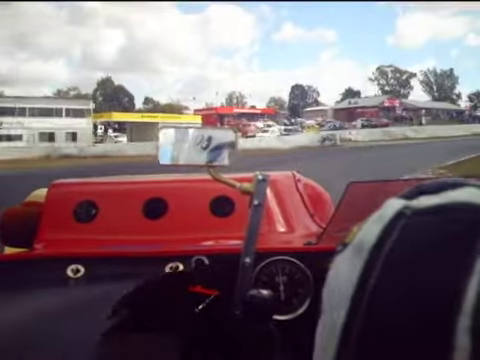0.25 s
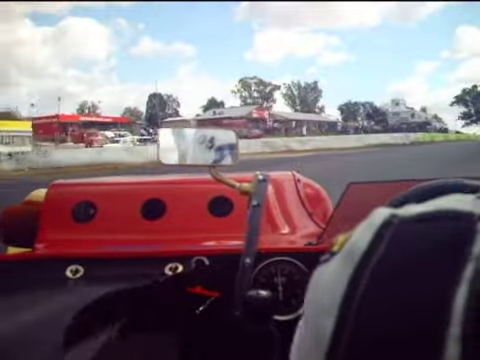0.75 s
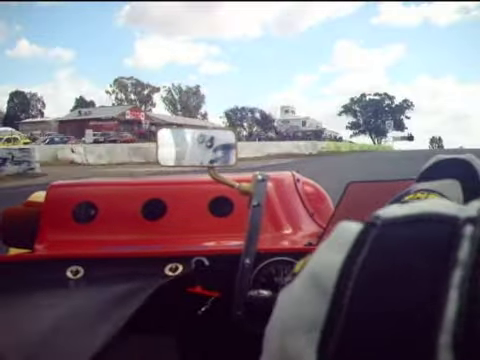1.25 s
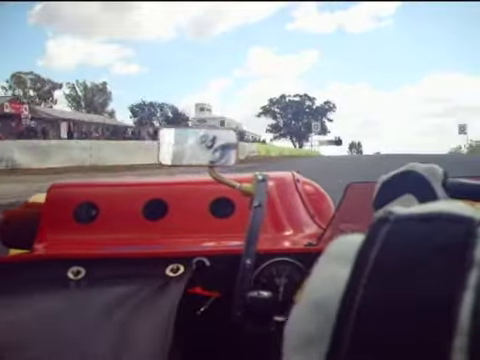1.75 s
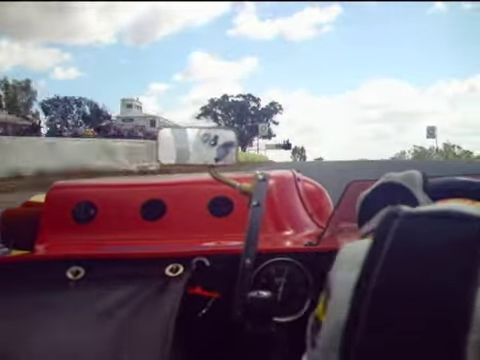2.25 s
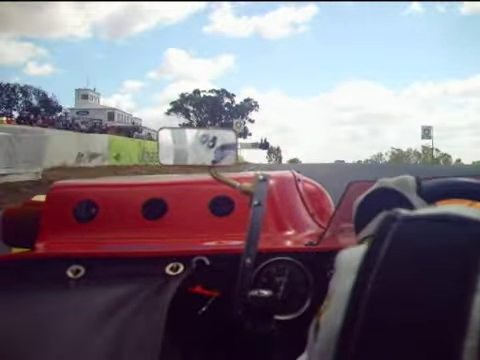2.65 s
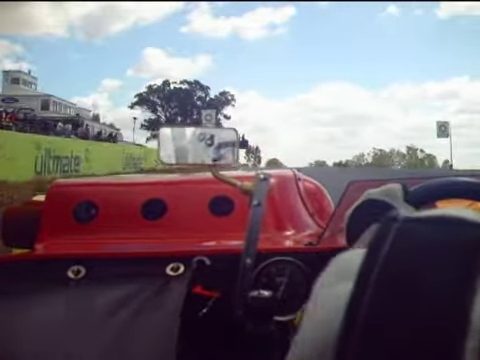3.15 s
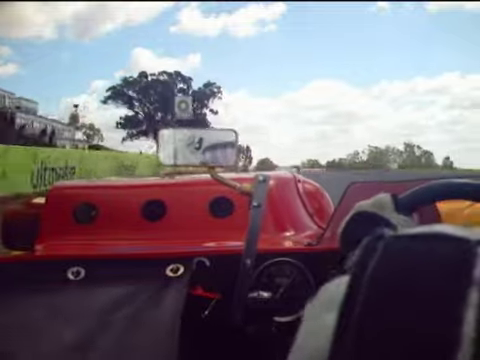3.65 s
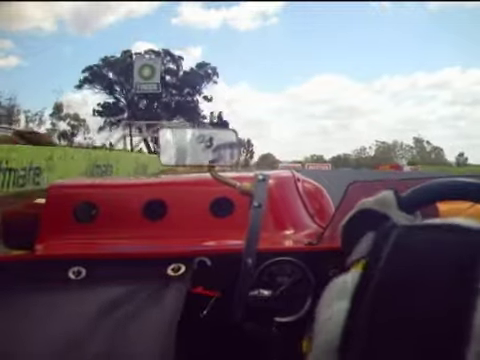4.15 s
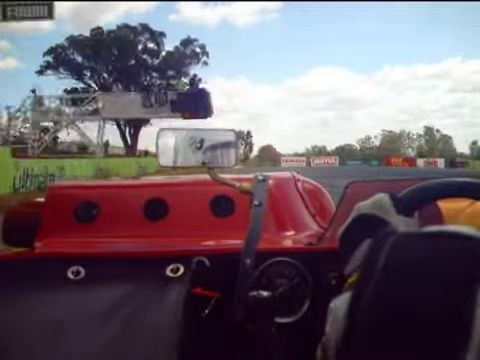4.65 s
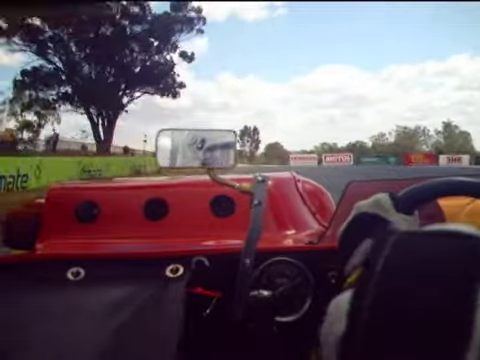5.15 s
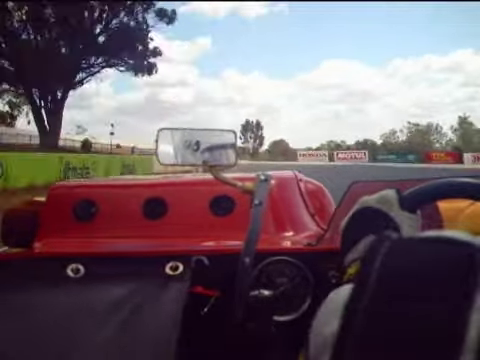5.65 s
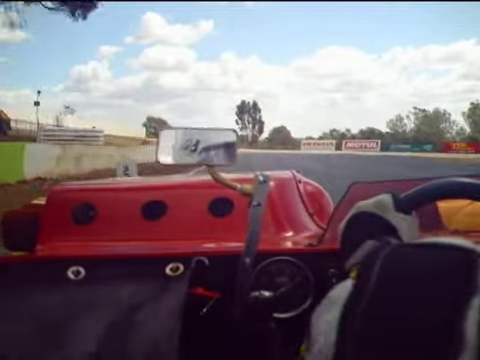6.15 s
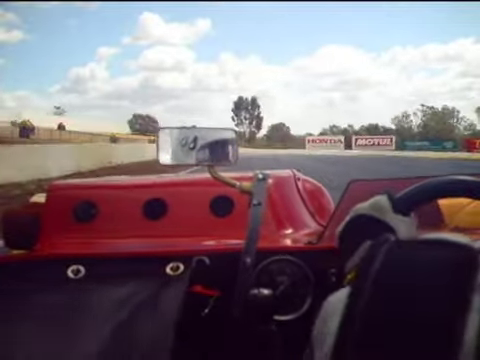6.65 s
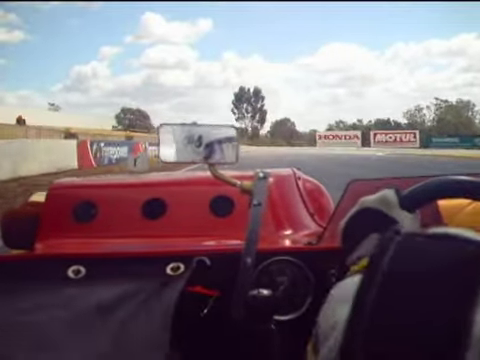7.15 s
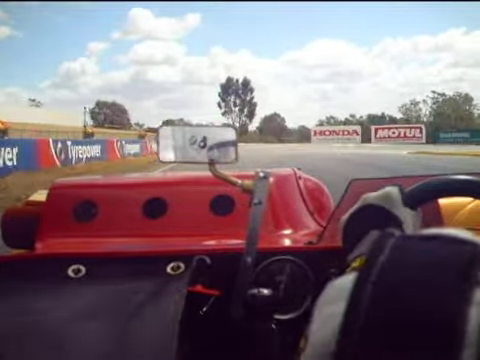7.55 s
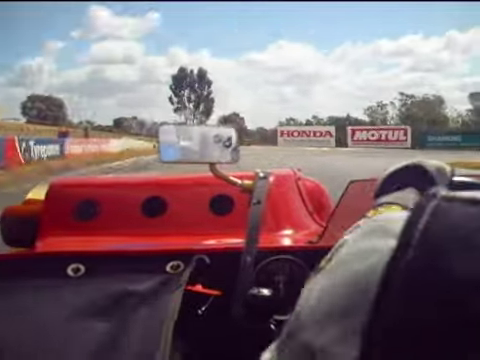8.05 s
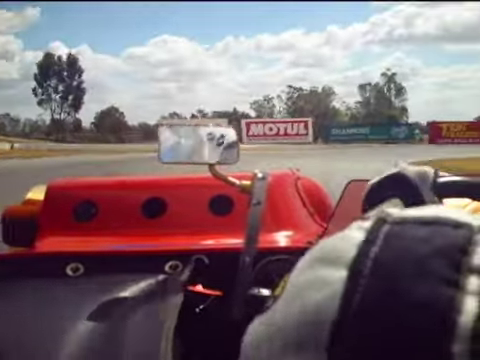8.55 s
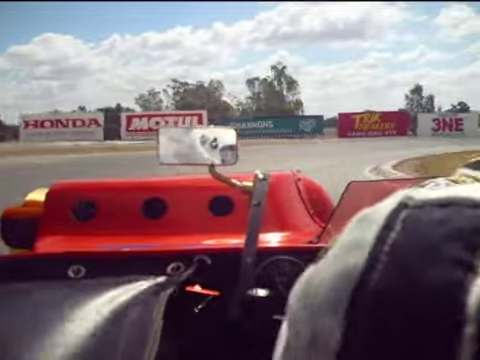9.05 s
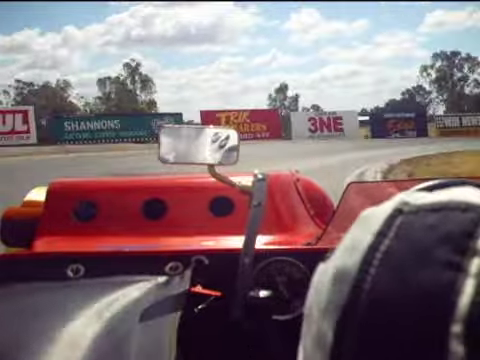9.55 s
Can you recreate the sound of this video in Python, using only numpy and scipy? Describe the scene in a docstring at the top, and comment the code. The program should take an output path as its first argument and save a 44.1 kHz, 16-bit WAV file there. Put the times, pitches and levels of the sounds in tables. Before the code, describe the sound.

A four-cylinder racing engine runs throughout, heard from its open cockpit with dull treble, over wind rumble on the microphone and a rush of air and tyres. A brief metallic knock comes right at the start. From about 1 second the engine pulls hard and rises steadily in pitch, with gear whine and ticking valves. From 4 seconds the exhaust swells into a loud boom, and sharp, irregular overload cracks break through between 4.4 and 6.4 seconds. Near 5.9 seconds the throttle lifts, and the crackle is thickest and raspy. The pitch then falls until nearly 9 seconds, while gears chatter in bursts and brakes rub with a thin ring, strongest just before 9. Two light knocks come just after 8 seconds. The engine settles into a low drone and gently picks up from about 9.2 seconds to the end.

```python
"""A four-cylinder racing engine, heard from its open car, pulls hard, lifts off near 5.9 s and,
after braking, picks up again. The exhaust booms as the firing rate sweeps through a resonance.
Straight-cut gears whine, and chatter when coasting; valves tap, brakes rub and wind buffets the cockpit.
A low-rate recorder dulls the treble, overloads on the boom and cracks at wave crests."""
import sys
import numpy as np
from scipy import signal
from scipy.fft import rfft, irfft, next_fast_len
from scipy.io import wavfile
from scipy.ndimage import uniform_filter1d

SR = 44100
rng = np.random.default_rng(int(sys.argv[2]) if len(sys.argv) > 2 else 0)


def persist_wave(psi):
    """Save psi, clipped to +-1, as 16-bit WAV."""
    counts = np.round(np.clip(psi, -1, 1) * 32767).astype(np.int16)
    wavfile.write(sys.argv[1], SR, np.atleast_2d(counts).T)


N = 431738
TIME = np.arange(N) / SR


# boom at each firing rate: f/Hz, pulling level/dB, level after lift-off/dB
BOOM_LEVELS = [(159.4, -17.5, -15.5), (169, -17, -16), (185, -24.5, -20), (192, -24, -20),
               (214, -29, -29.5), (219.7, -23, -20), (224.5, -15.5, -18), (233.7, -8, -11.5),
               (242, -10.5, -11), (244.5, -12.5, -28.5)]
# brief swells and dips: t/s, half length/s, change/dB
BOOM_SWELLS = [(5.48, 0.049, -2.5), (6.432, 0.025, 4), (6.685, 0.015, 7.5), (6.749, 0.018, -12)]

def boom(hz, firings, lift_off_s=5.85, fade_s=.2, flutter_db=.7):
    """The exhaust's main note, loudest where the firing rate meets a resonance."""
    rate, pulling, coasting = np.transpose(BOOM_LEVELS)
    lifted = np.clip((TIME - lift_off_s) / fade_s, 0, 1)
    level_db = (1 - lifted) * np.interp(hz, rate, pulling) + lifted * np.interp(hz, rate, coasting)
    level_db += sum(db * bump(s, half_s) for s, half_s, db in BOOM_SWELLS)
    return undb(level_db + flutter_db * walk(35)) * np.sin(2 * np.pi * firings)


# exhaust tones, in quarter steps as the cylinders are unequal: multiple of firing rate, level/dB
EXHAUST_TONES = [(.5, -37), (.75, -37.5), (1.25, -41.5), (1.5, -49), (2, -44), (2.25, -53.5), (2.5, -48),
                 (2.75, -47.5), (3, -44), (3.25, -52.5), (3.5, -50), (3.75, -48.5), (4, -51.5),
                 (4.25, -53.5), (4.5, -58), (4.75, -50), (5, -51.5), (5.25, -59), (5.5, -50.5),
                 (5.75, -59.5), (6, -51.5), (6.5, -48.5), (7, -48.5), (9.75, -52), (10.75, -51.5),
                 (11.75, -49.5), (12.25, -45.5), (12.75, -57)]
# pipe and bodywork resonances: f/Hz, width/Hz, boost/dB
BODY_RESONANCES = [(122.43, 4.9, 14.5), (238, 5, 5.5), (328.2, 6.1, 14), (465, 12, 3.5), (574.6, 18, 6.5),
                   (651, 6.2, 7.5), (660, 18, -5), (1017, 25, 9), (1210, 21, 5.5), (1480, 30, 4),
                   (2400, 30, 1.5), (2610, 78, 7.5), (2647, 58, 8.5)]

def exhaust(hz, firings, load, rough_db=3, jitter=.017):
    """The boom, plus tones that grow with throttle and waver as the fuel burns unevenly."""
    out = boom(hz, firings)
    uneven = firings + jitter * walk(40)
    for multiple, db in EXHAUST_TONES:
        size = load * undb(db + resonance_db(multiple * hz, BODY_RESONANCES) + rough_db * walk(9))
        out += size * np.sin(2 * np.pi * (multiple * uneven + rng.random()))
    return np.sqrt(2) * out


# shaft and gear tones: multiple of shaft rate, driving level/dB, coasting level/dB, waver/rad
GEAR_TONES = [(1, -31, -31.5, 0.95), (2, -34, -42.5, 0.15), (21, -43, -47, 1), (23, -44, -47, 0.71)]
# gear case resonances: f/Hz, width/Hz, boost/dB
CASE_RESONANCES = [(1450, 110, -1.5), (1604, 22, 6.5), (1667, 22, 7.5), (1950, 70, 5.5), (2110, 20, -5.5)]
SHAFT_RATIO = .4152  # shaft turns per firing

def gearbox(hz, firings, load, case_ring, tooth_db=6):
    """An unbalanced shaft throbs and teeth whine; coasting, they lose contact and the whine breaks up."""
    shaft, shaft_hz = SHAFT_RATIO * firings, SHAFT_RATIO * hz
    slack = 1 - load
    ring_db = 20 * np.log10(case_ring / np.median(case_ring))
    out = 0
    for multiple, drive_db, coast_db, waver in GEAR_TONES:
        db = load * drive_db + slack * coast_db + 1.9 * walk(6.3)
        db += resonance_db(multiple * shaft_hz, CASE_RESONANCES)
        db += (multiple > 2) * slack * (ring_db + tooth_db * walk(110))  # tooth tones only
        wobble = waver * (1 + 1.8 * slack) * walk(45)
        out += undb(db) * np.sin(2 * np.pi * multiple * shaft + wobble)
    return np.sqrt(2) * out


def squeal(hz, firings, load, multiple=19, centre_hz=4000, width_hz=85):
    """A thin squeal as a high multiple of the firing rate passes a sharp resonance."""
    off_centre = (multiple * hz - centre_hz) / width_hz
    size = load * undb(-52 + 1.7 * walk(25)) / np.sqrt(1 + off_centre ** 2)
    return np.sqrt(2) * size * np.sin(2 * np.pi * multiple * firings)


# chassis drone: t/s, level/dB
DRONE_LEVELS = [(0, -42), (1, -52), (2, -53.5), (5, -50), (7.6, -44), (8.1, -33), (8.8, -30.5), (9.3, -24),
                (9.79, -25)]

def drone(firings):
    """At low revs the chassis hums at firing plus shaft rate, and at twice the firing rate."""
    hum = np.sin(2 * np.pi * (1 + SHAFT_RATIO) * firings + .12 * walk(27))
    hum += undb(-12) * np.sin(2 * np.pi * 2 * firings + .5 * walk(25))
    return np.sqrt(2) * undb(curve(DRONE_LEVELS) + .98 * walk(5.8)) * hum


# bursts of gear chatter: start/s, end/s, clatter level/dB, case ring level/dB
CHATTER_BURSTS = [(2.983, 3.4, -42, -48), (5.15, 5.707, -38.5, -37), (6.364, 7.306, -32.5, -34),
                  (7.3, 7.728, -32, -37), (7.839, 7.972, -31, -32), (8.027, 8.115, -29.5, -31.5),
                  (8.216, 8.262, -30.5, -26.5), (8.347, 8.448, -30.5, -33), (8.493, 9.039, -33, -35.5)]

def rattling(hz, load, edge_s=.021):
    """Strength of clatter and case ring: both grow with throttle and in bursts, clatter also with revs."""
    octaves = np.log2(hz / 200)
    rattle_power = (undb(-29.5 + 5.2 * octaves) * load ** .3) ** 2
    ring_power = (undb(-34.5 - 1.4 * octaves) * load ** .4) ** 2
    for start, end, rattle_db, ring_db in CHATTER_BURSTS:
        burst = np.clip(.5 + np.minimum(TIME - start, end - TIME) / edge_s, 0, 1)
        rattle_power += burst * undb(rattle_db) ** 2
        ring_power += burst * undb(ring_db) ** 2
    return np.sqrt(rattle_power), np.sqrt(ring_power)


# ring of the valve gear: f/Hz, level/dB
VALVE_SPECTRUM = [(900, -23.5), (1400, -8), (1900, -6), (2130, -9), (2330, 5), (2450, -1.5), (2580, -0.5),
                  (2780, -2.5), (2950, -8.5), (3120, -10.5), (3500, -20), (3900, -23.5), (4300, -33.5)]

def valves(firings, count=16, ring_s=.0033, scatter_db=4, slop_s=.00005):
    """Valves tap shut at set points of each four-firing cycle, each with its own strength and some slop."""
    age = np.arange(1024) / SR
    ring = rng.standard_normal(len(age)) * np.exp(-age / ring_s)
    cycles = np.arange(int(firings[-1] / 4))[:, None]
    closings = 4 * (cycles + (np.arange(count) + rng.random(count)) / count)
    strength_db = 3 * rng.standard_normal(count)
    late, size = np.moveaxis(rng.standard_normal((600, count, 2))[:len(cycles)], -1, 0)
    at = np.interp(closings, firings, np.arange(N)) + slop_s * SR * late
    at = np.clip(at, 0, N - 1).astype(int)
    taps = np.bincount(at.ravel(), undb(strength_db + scatter_db * size).ravel(), N)
    return colour(signal.fftconvolve(taps, ring)[:N], VALVE_SPECTRUM)


# clattering teeth and the ringing gear case: f/Hz, level/dB
TEETH_SPECTRUM = [(900, -23.5), (1400, -27), (1900, -5.5), (2120, -10), (2350, 6.5), (2550, 8), (2750, 12),
                  (2950, 7), (3120, -5.5), (3500, -8), (3900, -21.5), (4300, -78)]
CASE_SPECTRUM = [(900, -30), (1250, -16.5), (1460, -1), (1550, -4.5), (1660, -1), (1800, -6), (2100, -9.5),
                 (2800, -27.5)]

def clatter(firings, load, rattle, case_ring, throb=.19):
    """Valve taps ring the engine as it pulls; coasting, the random chatter of loose teeth takes over."""
    taps = valves(firings)
    chatter = noise() * (1 + throb * np.cos(2 * np.pi * firings)) * undb(2 * walk(300))
    tap_share = .6 * load
    blows = np.sqrt(tap_share) * taps + np.sqrt(1 - tap_share) * colour(chatter, TEETH_SPECTRUM)
    return rattle * undb(-1) * blows + case_ring * undb(-4) * colour(chatter, CASE_SPECTRUM)


# rubbing of the pads: t/s, level/dB
BRAKE_LEVELS = [(0, -73.5), (6.2, -68), (6.5, -38.5), (7.8, -44.5), (8.6, -33), (8.75, -28.5), (9, -28),
                (9.08, -34), (9.79, -36.5)]
# ring of the discs: f/Hz, level/dB
DISC_SPECTRUM = [(2400, -29.5), (2570, -9), (2680, 5), (2830, -7), (2950, 4.5), (3060, -17), (3300, -23.5),
                 (3480, -15), (3700, -35.5)]

def brakes():
    """Pads rub unevenly and ring the discs."""
    return undb(curve(BRAKE_LEVELS) + .52 * walk(40)) * colour(noise(), DISC_SPECTRUM)


# single knocks: t/s, level/dB, decay/s
LOOSE_KNOCKS = [(0.087, -28, 0.0047), (0.096, -22, 0.01), (8.086, -32, 0.02), (8.236, -30, 0.018)]

def knocks():
    """Loose parts knock, briefly ringing the gear case and engine."""
    blows = sum(undb(db) * (TIME >= s) * np.exp(-np.abs(TIME - s) / decay) for s, db, decay in LOOSE_KNOCKS)
    metal = sum(colour(noise(), shape) for shape in (CASE_SPECTRUM, TEETH_SPECTRUM, RUSH_SPECTRUM))
    return blows * unit(metal)


# brief swells of deep rumble: t/s, half length/s, level/dB
RUMBLE_SWELLS = [(1.42, 0.036, -23), (1.78, .05, -23.5), (2.153, 0.24, -23.5), (2.53, .05, -25),
                 (3.073, 0.12, -25), (3.69, 0.041, -21), (4, .04, -26.5), (4.36, 0.041, -14),
                 (5.996, .04, -19), (7.331, 0.11, -16.5), (7.5, 0.06, -21.5), (8.43, 0.053, -20.5),
                 (8.84, 0.058, -21)]
# deep rumble of the wind: f/Hz, level/dB
WIND_SPECTRUM = [(15, -15), (24, -5), (32, -2), (38, -3), (46, -6.5), (60, -22), (100, -32.5), (200, -38.5)]

def wind(top_speed_s=5.3, fall_db_per_s=1.24):
    """Wind rumbles on the microphone, building to top speed, then easing; the rumble also swells briefly."""
    steady = undb(-25 - fall_db_per_s * np.abs(TIME - top_speed_s))
    swell_power = sum((undb(db) * bump(s, half_s)) ** 2 for s, half_s, db in RUMBLE_SWELLS)
    return np.sqrt(steady ** 2 + swell_power) * colour(noise(), WIND_SPECTRUM)


# cockpit rumble, and the rush of air and tyres: f/Hz, level/dB
COCKPIT_SPECTRUM = [(40, -6.5), (70, -0.5), (110, -3.5), (170, -5), (235, 3), (280, -1), (330, -14),
                    (450, -16.5), (650, -22), (1000, -48.5)]
RUSH_SPECTRUM = [(200, -6), (400, -5), (600, 1.5), (800, -4), (1050, 5.5), (1300, 3), (1700, 2.5),
                 (2200, -2), (3200, -1.5), (4300, -21.5)]
# the rush, swelling and easing over time: t/s, relative level/dB
RUSH_LEVELS = [(0, -41), (1.2, -39), (3, -40.5), (4.5, -38), (5.6, -42.5), (6.6, -46), (7.3, -42.5),
               (8.5, -45), (9.1, -39.5), (9.79, -41)]

def road_noise():
    """The cockpit rumbles while air and tyres rush."""
    rumble = undb(-27 + .37 * walk(14)) * colour(noise(), COCKPIT_SPECTRUM)
    rush = undb(curve(RUSH_LEVELS) + 3 + .61 * walk(50)) * colour(noise(), RUSH_SPECTRUM)
    return rumble + rush


# extra push into overload, peaking just after the lift-off: t/s, gain/dB
OVERLOAD_SURGE = [(0, -0.5), (4.2, 1), (4.6, 1.4), (5.2, 1), (5.85, 2.2), (5.93, 2.5), (6.05, 4),
                  (6.3, 3.5), (6.42, 2.44), (6.6, 1.77), (9.79, -2.2)]
CEILING, TREBLE_LIMIT_HZ = .73, 4150  # the recorder's largest swing and its treble limit

def overload(x, shake=.11, rasp_db=-22):
    """The surge throws the input off centre and flattens the crests, now above, now below, with a rasp."""
    surge_db = curve(OVERLOAD_SURGE)
    surge = np.clip(surge_db, 0, None)
    bias = shake * surge * np.tanh(walk(90))
    x = x * undb(surge_db) + bias + undb(rasp_db) * rasp(surge)
    return x / (1 + (x / CEILING) ** 24) ** (1 / 24) - .8 * bias


# rasp of the overload: f/Hz, level/dB
RASP_SPECTRUM = [(330, -10.5), (400, -2.5), (440, 10.5), (480, 1.5), (600, -4.5), (720, -3), (830, -11),
                 (970, -5.5), (1400, -12)]

def rasp(surge):
    """A rough noise that grows with the overload."""
    return (surge / surge.max()) ** 2 * colour(noise(), RASP_SPECTRUM)


# runs of random cracks: start/s, end/s, chance per crest, typical length/s
SPUTTER_RUNS = [(5.916, 5.96, .42, 0.00039), (6.007, 6.114, .32, 0.00023), (6.127, 6.243, .25, 0.00016),
                (6.26, 6.326, .32, .00022)]

def sputter(swing, length_spread=.74, edge_db=-32, edge_spread_db=6):
    """Pick crests that collapse by chance; gives rows of t/s, length/s, relative edge level/dB."""
    crests = signal.find_peaks(swing, distance=SR // 700)[0] / SR
    rows = []
    for start, end, chance, length_s in SPUTTER_RUNS:
        luck = rng.uniform(-1, 1, (200, 3))
        for s, (pick, length, edge) in zip(crests[(crests > start) & (crests < end)], luck):
            if abs(pick) < chance:
                stretch = np.exp(np.sqrt(3) * length_spread * length)
                rows.append((s, length_s * stretch, edge_db + np.sqrt(3) * edge_spread_db * edge))
    return rows


# the clearest overload cracks: t/s, relative edge level/dB
CLEAR_CRACKS = [(4.359, -27.5), (4.4392, -25), (4.5112, -25), (4.5157, -26), (4.5264, -41), (4.5364, -26),
                (4.5947, -20), (4.6311, -39), (4.6453, -23.5), (4.6634, -36), (4.7158, -31),
                (4.7502, -20.5), (4.792, -36), (4.8485, -38), (4.9079, -24), (5.011, -20.5), (5.0534, -26),
                (5.101, -45), (5.8349, -23.5), (5.8409, -33), (5.8476, -27), (5.8573, -25), (5.914, -36),
                (5.9223, -35), (5.9384, -23), (5.982, -37), (6.0008, -20.5), (6.0292, -26), (6.0933, -24),
                (6.1253, -24), (6.1544, -19), (6.1835, -25), (6.2627, -36), (6.2769, -25), (6.337, -23),
                (6.3865, -32), (6.401, -21)]

def cracks(x, crack_s=.00014, lag_s=.0012, depth=.74, overshoot=.11, edge_gain_db=14):
    """The recorder's numbers overflow: a crest collapses towards zero and bounces back with a sharp edge."""
    collapse, edges = np.zeros(N), np.zeros(N)
    reach = SR // 900
    offset = np.arange(-reach, reach)
    swing = np.abs(uniform_filter1d(x, size=40))
    clear = [(s + lag_s, crack_s, db) for s, db in CLEAR_CRACKS]
    for s, length_s, edge_db in sputter(swing) + clear:
        first = int(s * SR) - reach
        crest = first + np.argmax(swing[first:first + 2 * reach])
        outside = np.abs(offset) - length_s * SR / 2  # samples beyond the collapse
        rebound = overshoot * np.exp(-((outside - 4) / 3) ** 2)
        collapse[crest + offset] = np.sign(x[crest]) * (rebound - depth * np.clip(.5 - outside, 0, 1))
        edges[crest] = -np.sign(x[crest]) * undb(edge_db + edge_gain_db)
    collapse = signal.sosfilt(signal.butter(1, 190, "high", fs=SR, output="sos"), collapse)
    edges = signal.sosfilt(signal.butter(2, 7000, fs=SR, output="sos"), edges)
    return collapse, edges - low_pass(edges, TREBLE_LIMIT_HZ)


def undb(db):
    """Decibels to gain."""
    return 10 ** (np.asarray(db) / 20)


def curve(table):
    """Join (time, value) points with straight lines."""
    return np.interp(TIME, *np.transpose(table))


def bump(s, half_s):
    """A smooth swell of height 1 around time s."""
    return np.exp(-((TIME - s) / half_s) ** 2)


def unit(x):
    """Scale to an average strength (rms) of 1."""
    return x / np.sqrt(np.mean(x ** 2))


def noise():
    """White noise."""
    return rng.standard_normal(N)


def walk(rate):
    """A smooth random wobble with about `rate` turns a second; strength 1."""
    knots = rng.standard_normal(4000)
    path = np.interp(TIME * rate, np.arange(len(knots)), knots)
    return unit(uniform_filter1d(path, int(SR / rate)))


def resonance_db(hz, resonances):
    """The boost a tone at this frequency gets from nearby resonances."""
    grid = np.arange(SR / 8)
    return np.interp(hz, grid, sum(db / (1 + ((grid - f) / width) ** 2) for f, width, db in resonances))


def colour(x, spectrum):
    """Shape a sound to a spectrum, fading beyond its ends; strength 1."""
    size = next_fast_len(N)
    log_f = np.log(np.fft.rfftfreq(size, 1 / SR) + 1)
    hz, db = np.transpose(spectrum)
    beyond = np.maximum(np.log(hz[0]) - log_f, 0) + np.maximum(log_f - np.log(hz[-1]), 0)
    gain = undb(np.interp(log_f, np.log(hz), db) - 20 * beyond)
    return unit(irfft(rfft(x, size) * gain, size)[:N])


def low_pass(x, hz, order=8):
    """Cut the treble above hz steeply, without delay."""
    margin = SR // 50
    sections = signal.ellip(order, .1, 50, hz, fs=SR, output="sos")
    return signal.sosfiltfilt(sections, np.pad(x, margin))[margin:-margin]


# engine speed as firings per second: t/s, f/Hz
FIRING_RATE = [(0, 184.3), (.4, 183.2), (.8, 185.1), (1.2, 190), (1.6, 193.7), (2.4, 204.1), (3.2, 216.5),
               (4, 225.9), (5.6, 247.2), (5.8, 245.7), (5.92, 240.6), (6.1, 239.7), (6.7, 226.3),
               (7, 221.6), (7.3, 214.1), (7.9, 188.9), (8.75, 160.5), (9.79, 163.8)]
# how hard the throttle makes the engine work: t/s, level/dB
ENGINE_LOAD = [(0, -9.5), (.6, -4.5), (1.3, -0.5), (5.1, -0.5), (5.8, -3.5), (6, -12.5), (6.6, -5),
               (7.4, -11), (8.2, -15), (9, -13.5), (9.2, -8), (9.79, -6)]

def scene():
    """Engine speed and throttle drive the machinery; brakes, knocks and rushing air join in."""
    hz = curve(FIRING_RATE)
    load = undb(curve(ENGINE_LOAD))
    firings = np.cumsum(hz) / SR  # how many so far
    rattle, case_ring = rattling(hz, load)
    engine = exhaust(hz, firings, load) + gearbox(hz, firings, load, case_ring)
    engine += squeal(hz, firings, load) + drone(firings) + clatter(firings, load, rattle, case_ring)
    return (engine + brakes() + knocks() + wind() + road_noise())[None]


def record(dry):
    """A low-rate recorder overloads and dulls the treble; only the edges of cracks reach higher."""
    x = overload(dry[0])
    collapse, edges = cracks(x)
    narrow = low_pass(x, TREBLE_LIMIT_HZ)
    mirror = narrow * 2 * np.cos(2 * np.pi * 8000 * TIME)  # slow 8000 Hz sampling mirrors the top tones
    cracked = np.clip(narrow + collapse, -CEILING, CEILING)
    muffled = low_pass(cracked + mirror, hz=3900, order=6)
    return low_pass(muffled + edges, hz=15900)[None]


dry = scene()
out = record(dry)
persist_wave(out)
```